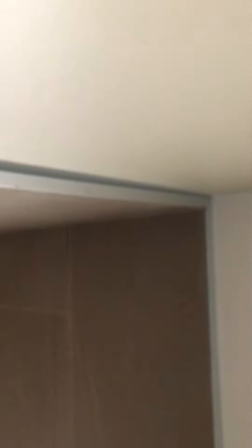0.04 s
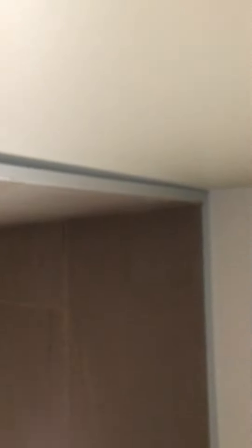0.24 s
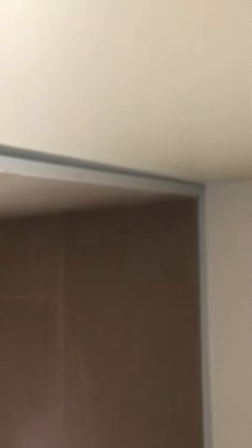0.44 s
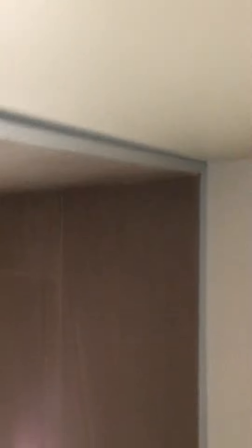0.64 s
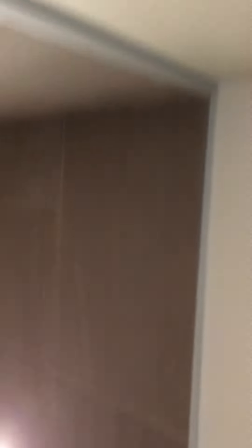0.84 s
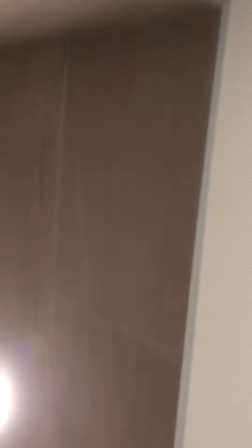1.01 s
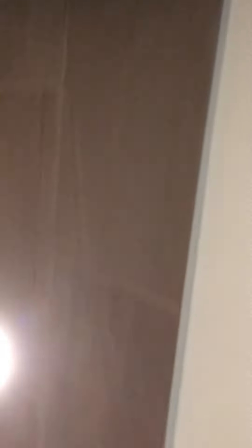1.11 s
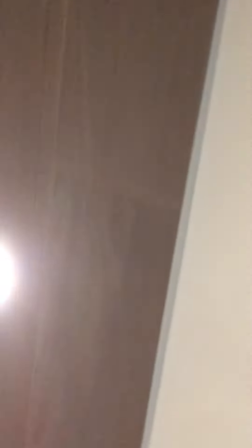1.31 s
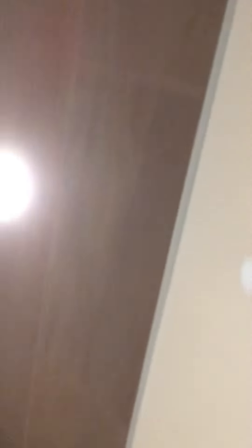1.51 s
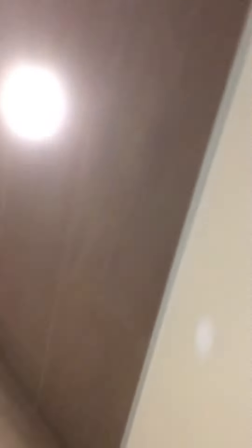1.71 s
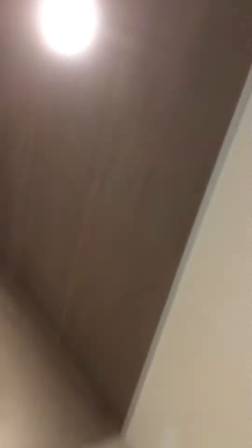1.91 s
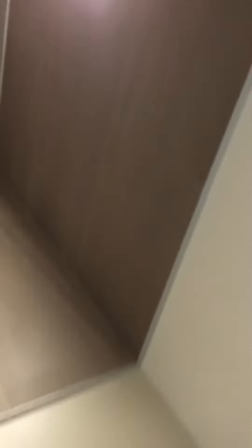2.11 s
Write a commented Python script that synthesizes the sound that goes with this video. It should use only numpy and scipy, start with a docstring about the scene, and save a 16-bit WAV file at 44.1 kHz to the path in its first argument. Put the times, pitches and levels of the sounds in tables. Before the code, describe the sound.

A heavy door shuts in a small tiled room. A quick, soft sleeve swish comes at 0.1 seconds, then at 0.2 the latch clatters home with a metallic ring and a deep thud. The boom fades by about 1 second, with a few faint hardware ticks. Quiet clothing rustle and light handling bumps continue close by, ending with a stronger dull bump and swish at 2 seconds.

```python
"""A small tiled room: a heavy door shuts, pushing a low swell of air ahead of it.
The bolt touches its plate, clatters home and rings; the slab thuds into its frame and the low modes
of slab and room boom. The hardware ticks as it settles. Close by, clothing slides in grainy swishes
before and after, with soft bumps of handling and movement."""
import sys
import numpy as np
from scipy import signal
from scipy.fft import rfft
from scipy.io import wavfile
from scipy.ndimage import uniform_filter1d

SR = 44100
rng = np.random.default_rng(int(sys.argv[2]) if len(sys.argv) > 2 else 0)


def transcribe(u):
    """Save the signal u as a 16-bit wav file named by the first command-line argument.

    u: samples, shape (n,) or (channels, n), limited to [-1, 1]; the rate is SR.
    q: integer samples, one column per channel.
    """
    v = np.clip(np.atleast_2d(u).T, -1, 1)
    q = np.round(v * 32767).astype(np.int16)
    wavfile.write(sys.argv[1], SR, q)


N = 94815
TIME_S = np.arange(N) / SR
FREQ_HZ = np.fft.rfftfreq(N, 1 / SR)


def amp(db):
    """Decibels to gain."""
    return 10 ** (np.asarray(db) / 20)


def unit(x):
    """Scale to unit rms."""
    return x / np.sqrt(np.mean(x ** 2) + 1e-20)


def lookup(points, hz):
    """Interpolate a table over log frequency."""
    points_hz, values = np.transpose(points)
    return np.interp(np.log(hz + 1), np.log(points_hz + 1), values)


def add(mix, start_s, sound):
    """Mix a sound in at start_s."""
    part = mix[max(round(start_s * SR), 0):][:len(sound)]
    part += sound[:len(part)]


def filtered_noise(gains):
    """Unit-rms noise, weighted by one gain per FFT bin."""
    return unit(np.fft.irfft(rfft(rng.standard_normal(N)) * gains, N))


def noise(colour):
    """Unit-rms noise with a tabulated spectral shape."""
    return filtered_noise(amp(lookup(colour, FREQ_HZ)))


def decay(t60_s, age_s=TIME_S):
    """Exponential fall, 60 dB in t60_s."""
    return np.exp(-np.log(1000) * age_s / t60_s)


def ring(modes):
    """Sum of damped sines."""
    return sum(amp(db) * decay(t60_s) * np.sin(2 * np.pi * hz * TIME_S) for hz, db, t60_s in modes)


# Still room spectrum: freq_hz, gain_db
ROOM_TONE_COLOUR = [(20, -7.5), (60, -2.5), (95, 2), (150, -18.5), (350, -12.5), (600, -25), (2000, -31.5),
                    (6000, -30.5), (16000, -48)]


def room_tone(level_db=-65.5):
    """Faint, steady low noise of the still room."""
    return amp(level_db) * noise(ROOM_TONE_COLOUR)


# Rustle envelopes: time_s, body_db, treble_db
RUSTLE_LEVELS = [(0, -61, -65), (.15, -58.5, -61), (0.499, -57, -77), (0.729, -68, -74), (.8, -63, -64.5),
                 (.845, -65, -67), (.88, -60.5, -70.5), (.96, -67, -72.5), (1.12, -64.5, -68.5),
                 (1.241, -68.5, -75), (1.311, -70.5, -74), (1.345, -69, -65), (1.405, -69, -64),
                 (1.46, -69.5, -73), (1.6, -63.5, -67), (1.79, -62.5, -67.5), (1.88, -64.5, -61),
                 (1.972, -48, -52.5), (2.06, -48, -52.5), (2.15, -57, -60.5)]
# Sleeve swish envelope: time_s, level_db
SLEEVE_LEVELS = [(0, -88), (.03, -80), (.06, -52), (.09, -48.5), (.15, -51.5), (.2, -55), (.3, -64.5),
                 (.45, -97)]
# Cloth spectra: freq_hz, gain_db
BODY_COLOUR = [(40, -3), (110, 1), (200, 5), (350, 0), (650, 1), (1300, 1.5), (2300, 0), (3000, -5),
               (5000, -11), (16000, -46)]
TREBLE_COLOUR = [(200, -31), (2000, -4.5), (4000, -1.5), (6800, -1), (8000, -4), (9500, -2.5), (10500, -8),
                 (12800, -4.5), (16000, -12)]
SLEEVE_COLOUR = [(200, -29), (2500, -8), (4700, 6), (7000, -0.5), (10000, 0), (13000, -0.5), (16000, -15)]


def clothing(grain_db=0.5, grain_s=0.003):
    """Sliding cloth: dull body, bright hiss and one quick sleeve swish, all slightly grainy."""
    flicker = unit(uniform_filter1d(rng.standard_normal(N), int(grain_s * SR)))
    grain = unit(amp(grain_db * flicker))
    time_s, body_db, treble_db = np.transpose(RUSTLE_LEVELS)
    body = amp(np.interp(TIME_S, time_s, body_db)) * noise(BODY_COLOUR)
    treble = amp(np.interp(TIME_S, time_s, treble_db)) * noise(TREBLE_COLOUR)
    sleeve = amp(np.interp(TIME_S, *np.transpose(SLEEVE_LEVELS))) * noise(SLEEVE_COLOUR)
    return grain * (body + treble + sleeve)


# Handling and movement: start_s, level_db, pitch_hz, rise_s, t60_s, noise_ratio
BUMPS = [(0.0, -45, 360.7, 0.0043, 0.33, 0.21), (0.0, -48.5, 197.7, 0.0024, 0.25, 0.55),
         (.93, -61, 355, 0.033, 0.57, 0.83), (1.01, -57.5, 147.3, 0.0084, 0.33, .6),
         (1.306, -45, 111, 0.0089, 0.47, 0.27), (1.309, -55, 187, 0.0068, 0.31, 0.61),
         (1.685, -51.5, 103.7, 0.014, 0.33, 0.18), (1.68, -59.5, 294.5, 0.025, 0.34, 0.98),
         (1.906, -58, 410, 0.0038, 0.45, 0.93), (1.963, -39, 299, 0.0094, 0.29, 0.32),
         (1.964, -42, 228.5, 0.0095, 0.67, 0.36), (1.975, -44, 411.6, .012, 0.29, 0.094),
         (1.993, -25.5, 108, 0.027, 0.17, .12)]


def bumps(half_width_oct=0.38):
    """Soft blows, each exciting a low resonance and a noise band around it."""
    out = np.zeros(N)
    for start_s, level_db, pitch_hz, rise_s, t60_s, noise_ratio in BUMPS:
        offset_oct = np.log2((FREQ_HZ + 1) / pitch_hz)
        band = filtered_noise(1 / (1 + (offset_oct / half_width_oct) ** 4))
        tone = np.sin(2 * np.pi * pitch_hz * TIME_S)
        envelope = np.minimum(TIME_S / rise_s, 1) * decay(t60_s)
        add(out, start_s, amp(level_db) * envelope * (tone + noise_ratio * band))
    return out


# Air swell envelope: time_s, level_db
AIR_LEVELS = [(0, -52.5), (.08, -50.5), (0.151, -58), (.19, -44), (.22, -24), (.28, -62)]
# Air spectrum: freq_hz, gain_db
AIR_COLOUR = [(15, -14), (40, -4.5), (80, 0), (150, -12), (300, -9.5), (1000, -61)]


def air_push():
    """Low swell of air ahead of the swinging door."""
    level_db = np.interp(TIME_S, *np.transpose(AIR_LEVELS), right=-np.inf)
    return amp(level_db) * noise(AIR_COLOUR)


# Tiled room reverberation: freq_hz, t60_s
ROOM_DECAY = [(60, 0.87), (250, 1), (500, 0.68), (1000, 0.46), (1850, 0.65), (3000, 0.46), (4200, 0.5),
              (8000, 0.57), (16000, 0.4)]


def knock(colour, direct_db, rise_s=0.00066, fall_s=0.0062):
    """Hard contact: a short crack plus its tail off the tiles, each band decaying at its own rate."""
    band_hz, frame_s, bands = signal.stft(noise(colour), SR, nperseg=512)
    t60_s = lookup(ROOM_DECAY, band_hz)[:, None]
    tail = signal.istft(bands * decay(t60_s, frame_s), SR, nperseg=512)[1][:N]
    crack = noise(colour) * np.minimum(TIME_S / rise_s, 1) * np.exp(-TIME_S / fall_s)
    return (unit(tail) + amp(direct_db) * unit(crack)) / np.sqrt(N)  # tail at unit energy


# Latch and frame contacts, settling ticks: start_s, gain_db
CLACKS = [(0.1819, -14), (0.1871, -3.5), (0.1909, -10), (0.1979, -8), (.2075, -8.5), (0.2139, -10),
          (0.2224, -19.5), (.243, -28)]
TICKS = [(0.3552, -26), (0.4135, -31.5), (0.545, -33), (0.6468, -33.5)]
# Contact spectra: freq_hz, gain_db
TOUCH_COLOUR = [(200, 3.5), (1200, -6.5), (2200, 6), (3300, -14.5), (6000, -19), (16000, -31)]
CLACK_COLOUR = [(150, -12.5), (320, 1), (540, -9.5), (750, -3), (850, -9), (960, -1.5), (1080, -6.5),
                (1450, -4), (2100, -4), (3000, -10), (3900, -12), (5100, -21), (9400, -29), (15500, -49)]
TICK_COLOUR = [(200, -30), (2300, -12), (4000, 4), (4700, -7.5), (6300, -4.5), (9000, -12), (12000, -14.5),
               (16000, -20.5)]
# Modes of latch and door skin, and of the ticking hardware: pitch_hz, gain_db, t60_s
LATCH_MODES = [(596, -4, 0.27), (740, -11, 0.44), (958, -20, 0.64), (1404, -3, 0.2), (1436, -7, 0.31),
               (1600, -7, 0.31), (1571, -4.5, 0.83), (1687, 4, 0.5), (1965, -4, 0.83), (2020, -0.5, 0.59),
               (2159, -4, 0.27), (2740, -5, 0.27), (4140, -9.5, 0.68), (4030, -2, 0.27)]
TICK_MODES = [(4032, -39.5, 0.63), (5360, -40.5, 0.56), (6600, -47, 0.36), (8400, -39, 0.31)]


def latch(touch_s=0.14, touch_db=-17.5, clack_gain_db=5, ring_gain_db=-40):
    """The bolt touches its plate, clatters home and rings; the hardware ticks as it settles."""
    out = np.zeros(N)
    add(out, touch_s, amp(touch_db) * knock(TOUCH_COLOUR, direct_db=-4.5))
    partials = np.array([ring([mode]) for mode in LATCH_MODES])
    for start_s, gain_db in CLACKS:
        polarities = rng.choice([-1, 1], len(partials))
        metal = amp(ring_gain_db) * (polarities @ partials)
        clack = amp(clack_gain_db) * knock(CLACK_COLOUR, direct_db=-3)
        add(out, start_s, amp(gain_db) * (clack + metal))
    for start_s, gain_db in TICKS:
        tick = knock(TICK_COLOUR, direct_db=0) + ring(TICK_MODES)
        add(out, start_s, amp(gain_db) * tick)
    return out


# Slab meets frame, then seats: start_s, gain_db
THUDS = [(0.2017, -9.5), (.2308, -2)]
# Low modes of slab and room: pitch_hz, gain_db, t60_s
BOOM_MODES = [(32.7, -26, 0.69), (50, -9, 0.36), (57.6, -19.5, 0.87), (64.1, -25, 0.8), (70.77, -21, 0.82),
              (74.8, -18.5, 0.97), (95.1, -24.5, 1.03), (104.5, -26.5, 0.98), (138, -30, 0.95),
              (230, -37.5, 1.34), (307.6, -46.5, 1.56), (348, -41, 0.65), (448, -40, 0.44)]
# Thud rumble spectrum: freq_hz, gain_db
RUMBLE_COLOUR = [(15, -12), (45, -12), (80, 5.5), (140, 2), (200, -6.5), (330, -8.5), (600, -34),
                 (2000, -61)]


def slab(rise_s=0.0035, rumble_db=-23, rumble_t60_s=0.59):
    """The door's weight sets the low modes booming; the first thud also starts a diffuse rumble."""
    out = np.zeros(N)
    attack = 1 - np.exp(-TIME_S / rise_s)
    boom = attack * ring(BOOM_MODES)
    for start_s, gain_db in THUDS:
        add(out, start_s, amp(gain_db) * boom)
    rumble = attack * decay(rumble_t60_s) * noise(RUMBLE_COLOUR)
    add(out, THUDS[0][0], amp(rumble_db) * rumble)
    return out


def scene():
    """Mono mix of door, movement and still room."""
    return (air_push() + latch() + slab() + bumps() + clothing() + room_tone())[None]


def record(dry):
    """Steep low-pass at the top of the treble."""
    cutoff_hz = 15750
    lowpass = signal.firwin(511, cutoff_hz, window=("kaiser", 9), fs=SR)
    return signal.oaconvolve(dry, lowpass[None], "same")


dry = scene()
out = record(dry)
transcribe(out)
```